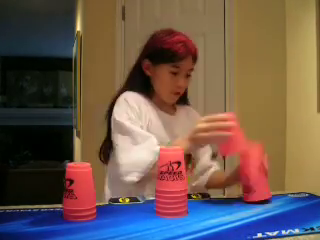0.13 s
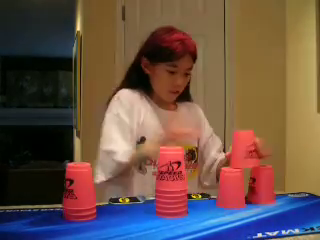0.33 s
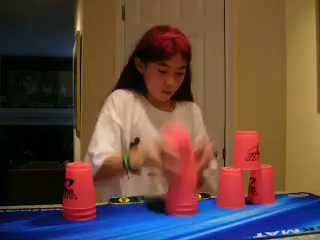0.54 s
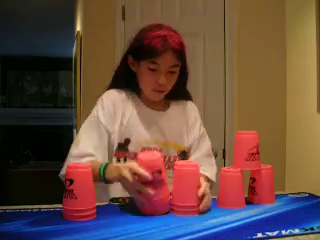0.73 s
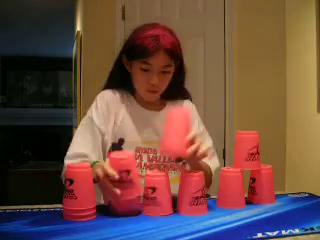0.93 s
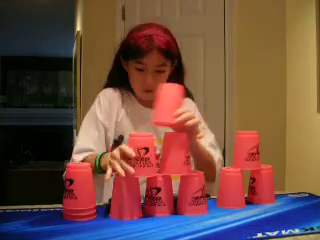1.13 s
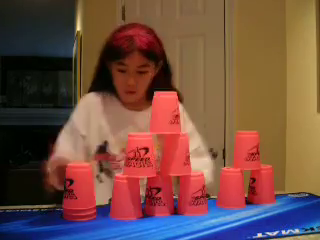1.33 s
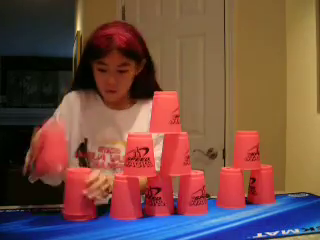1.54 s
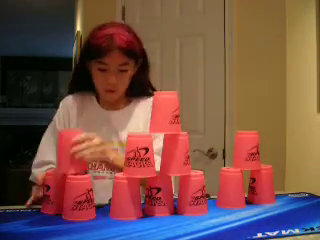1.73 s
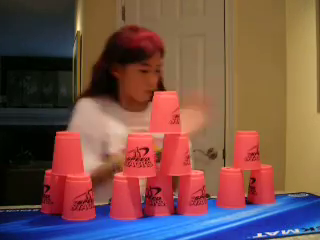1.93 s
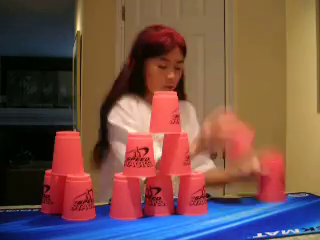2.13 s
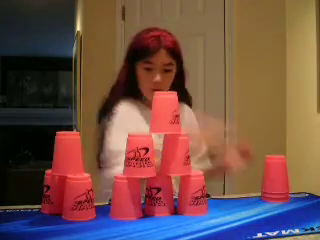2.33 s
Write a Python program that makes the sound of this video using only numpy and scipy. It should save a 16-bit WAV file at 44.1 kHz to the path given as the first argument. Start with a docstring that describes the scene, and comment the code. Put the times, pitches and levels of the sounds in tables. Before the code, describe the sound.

Hollow plastic cups are stacked at speed, clacking rapidly, easing for a moment, then ending in a dense clatter. Small pops, scrapes and soft mat thuds mix in. The room is small and echoing, the microphone slightly dull.

```python
"""In a small, echoing room, plastic cups are stacked into pyramids at speed on a mat.
Each hit makes a clack: the air in the cup, its shell and its rim all ring for a moment.
Nested cups pop and scrape as they are pulled apart, and cups landing on the mat thud softly.
A steady hush lies behind it all. The microphone dulls lows and highs and overloads on hard clacks."""
import sys
import numpy as np
from scipy import signal
from scipy.fft import rfft, irfft, next_fast_len
from scipy.io import wavfile

SR = 44100
rng = np.random.default_rng(int(sys.argv[2]) if len(sys.argv) > 2 else 0)


def int16_out(signal):
    """Quantize to a 16-bit WAV file."""
    q = np.round(np.clip(np.atleast_2d(signal).T, -1, 1) * 32767)
    wavfile.write(sys.argv[1], SR, q.astype(np.int16))


N = 110250

# Cups hitting each other; t60 is the time a sound takes to fade by 60 dB.
# t/s, air note f/Hz, air note level/dB, air note t60/s, shell level/dB, rim level/dB
CUP_HITS = [ (.091, 700, -44, 0.034, -32, -34.5), (.143, 847, -16.5, 0.06, -28, -12.5),
            (.1478, 788, 3.5, 0.009, -7, -16), (.171, 750, -27.5, 0.032, -4, -39.5),
            (.3475, 832, 5.5, 0.023, -7.5, 1.5), (.3577, 641, -0.5, 0.03, -22, -9.5),
            (.3922, 941, -3, 0.041, -3.5, -10.5), (.529, 887, -5.5, 0.013, -17, -28.5),
            (.7525, 1160, -15.5, 0.016, -28.5, -27.5), (.774, 771, -13, 0.0083, -18.5, -33),
            (.857, 1050, -4.5, 0.015, -12, -1.5), (.957, 886, -21, 0.018, -42.5, -49),
            (1.0455, 743, -23.5, 0.013, -51, -13), (1.0733, 757, 5, 0.011, -21.5, -22),
            (1.1185, 691, 4, 0.01, -2, -14.5), (1.2217, 910, 6, 0.015, -10, -9),
            (1.3012, 970, 3, 0.015, -9, -2), (1.644, 778, -24.5, 0.019, -24, -62.5),
            (1.724, 735, -33.5, 0.022, -41.5, -29), (1.7853, 553, -16.5, 0.072, -31, -19.5),
            (1.866, 823, 7.5, 0.011, -11.5, -1), (1.8829, 850, -6.5, 0.02, -14.5, -24),
            (2.154, 690, -12, 0.021, -22, -30), (2.1625, 790, -3, 0.015, -29, -23),
            (2.1724, 942, -1.5, 0.0093, -10, -25.5), (2.1782, 868, 9.5, 0.0067, -25, -24.5),
            (2.1858, 1040, -5, 0.031, -34.5, -23), (2.2055, 696, -7, 0.014, -18.5, -12.5),
            (2.2455, 680, -17.5, 0.041, -25, -8.5), (2.2558, 660, -11.5, 0.017, -12.5, -20.5),
            (2.2686, 1500, 2, 0.019, -12, -0.5), (2.2694, 1789, -4, 0.045, -19.5, -20.5),
            (2.336, 810, 0, 0.016, -16.5, -10.5), (2.347, 778, -18, 0.071, -24.5, -0.5),
            (2.3855, 795, -6.5, 0.01, -1.5, -15), ]
# The tones of a cup's shell: f/Hz, level/dB, t60/s
SHELL_TONES = [(1258, 4.5, 0.017), (1388, -13, 0.06), (1519, 0.5, 0.021), (1574, 0.5, 0.025),
               (1838, 1, 0.017), (2014, -1.5, 0.026)]
# The tones of its rim: f/Hz, level/dB, t60/s
RIM_TONES = [(2540, 2, 0.0041), (2714, -14, 0.018), (3172, -7.5, 0.012), (3717, -7.5, 0.0079)]
# Air drawn in or pushed out as a cup leaves or meets another: peak t/s, f/Hz, level/dB
AIR_POPS = [(.2123, 633, -3), (.862, 637, -5), (1.788, 710, -12)]
# Cups landing on the mat: t/s, f/Hz, level/dB
MAT_LANDINGS = [(0.147, 304, -9), (1.119, 367.4, -20), (1.786, 395, -24.5), (2.151, 354, -14.5),
                (2.162, 325.5, -10.5), (2.334, 330, -20.5)]
# Cup sliding on cup: t/s, length/s, level/dB, squeak f/Hz, squeak width/Hz
CUP_SLIDES = [(0.187, 0.019, -16, 3010, 700), (0.206, 0.08, -25, 3000, 1100),
              (0.852, 0.016, -21.5, 2750, 800), (1.056, 0.022, -15, 2830, 170),
              (1.0757, 0.0042, -14, 2860, 200), (1.0804, .005, -13, 2850, 250),
              (2.157, 0.039, -26.5, 2770, 600), (2.208, .032, -24.5, 3000, 700),
              (2.236, 0.028, -20, 2890, 890), (2.351, 0.0242, -18.5, 2950, 600)]
# How long the room echoes at each pitch: f/Hz, t60/s
ECHO_DECAY = [(150, 3.23), (400, 0.39), (1000, 0.85), (2000, 0.54), (3500, 0.6)]
# How strong its echoes are at each pitch: f/Hz, level/dB
ECHO_COLOUR = [(130, -15), (220, -8), (330, -2), (600, 0), (1000, -1.5), (2000, -1), (4000, -8.5)]
# The tones the room itself rings with: f/Hz, level/dB, t60/s
ROOM_TONES = [(354, -6, .5), (517, 0, .45), (795, -1, .4), (915, 1, .48), (1010, -6, .45), (1141, -3, .4),
              (1202, -3, .4), (1250, -2, .4), (1455, 0, .4), (1543, -1, .45), (1772, -3, .35)]
# The shape of the background hush: f/Hz, relative level/dB
HUSH_COLOUR = [(25, 15.5), (100, -10), (300, -7), (700, -18), (1200, -9), (2500, -10), (4000, -12.5)]
# How well the microphone picks up each pitch: f/Hz, level/dB
MIC_RESPONSE = [(30, -23), (120, -7.5), (280, -0.5), (420, 3), (560, 3), (950, -2), (1150, -2.5),
                (2000, -5.5), (3500, -6.5), (3950, -12.5), (4300, -26), (4650, -83.5)]

NOTE_RISE_S, CRACK_T60_S = 0.00071, 0.0042
POP_RISE_S, POP_FALL_S, POP_ECHO_DB = 0.0015, 0.0028, -3
THUD_RISE_S, THUD_T60_S = 0.0015, 0.026
SLIPS_PER_S = 1400
TAIL_DB, EARLY_DB, ROOM_TONES_DB = -4.5, -6, -48
ECHO_RISE_S, EARLY_T60_S = 0.0025, 0.2
HUSH_DB = -37.5
MIC_OFFSET, CLIP_DB, CLIP_HARDNESS, TOP_HZ = -0.033, -2, 32, 16500


def cup_clacks():
    """Each hit gives a sharp crack and rings the air in the cup, its shell and its rim."""
    track, t = np.zeros(N), np.arange(SR // 10) / SR
    for start, hz, note_db, t60, shell_db, rim_db in CUP_HITS:
        air_note = np.sin(2 * np.pi * hz * t) * fade(t, t60) * (1 - np.exp(-t / NOTE_RISE_S))
        crack = rng.standard_normal(len(t)) * fade(t, CRACK_T60_S)
        shell = ring(SHELL_TONES, t, phase_scatter=0.65)
        rim = ring(RIM_TONES, t)
        clack = amp(note_db) * air_note + amp(shell_db) * shell + amp(rim_db) * (rim + crack)
        add(track, start, in_room(clack))
    return track


def air_pops():
    """The air in a cup swells into one round note and dies away."""
    track, t = np.zeros(N), np.arange(-SR // 20, SR // 20) / SR
    swell = 1 / (np.exp(-t / POP_RISE_S) + np.exp(t / POP_FALL_S))
    swell /= swell.max()
    for peak_time, hz, db in AIR_POPS:
        pop = amp(db) * swell * np.sin(2 * np.pi * hz * t)
        add(track, peak_time + t[0], in_room(pop, echo_db=POP_ECHO_DB))
    return track


def mat_thuds():
    """The padded table answers a landing cup with a short, low note."""
    track, t = np.zeros(N), np.arange(SR // 10) / SR
    loudness = fade(t, THUD_T60_S) * (1 - np.exp(-t / THUD_RISE_S))
    for start, hz, db in MAT_LANDINGS:
        thud = amp(db) * loudness * np.sin(2 * np.pi * hz * t)
        add(track, start, in_room(thud))
    return track


def cup_scrapes():
    """Tiny, uneven slips ring the cup's wall: a narrow band of pitches squeaks, a wide one rasps."""
    track, t = np.zeros(N), np.arange(SR // 10) / SR
    for start, length, db, hz, width in CUP_SLIDES:
        slips = (rng.random(len(t)) < SLIPS_PER_S / SR) * rng.standard_normal(len(t))
        # The wall favours the pitches close to hz.
        squeak = filtered(slips, lambda f: 1j * f * width / (hz ** 2 - f ** 2 + 1j * f * width))
        progress = np.minimum(t / length, 1)
        stroke = np.sqrt(np.abs(np.sin(np.pi * progress)))
        stroke_level = np.sqrt(np.mean(stroke ** 2))
        scrape = amp(db) * stroke_level * unit(stroke * squeak)
        add(track, start, in_room(scrape))
    return track


def in_room(sound, echo_db=0):
    """Add the room's echoes, drawn anew each time because they differ from spot to spot on the table."""
    t = np.arange(SR * 3 // 4) / SR
    # Split noise into pitches and let each fade at its own speed.
    hz, times, bands = signal.stft(rng.standard_normal(len(t)), SR, nperseg=256)
    bands = bands * fade(times, along(ECHO_DECAY, hz)[:, None])
    tail = signal.istft(bands, SR)[1][:len(t)]
    early = rng.standard_normal(len(t)) * fade(t, EARLY_T60_S)
    echoes = amp(TAIL_DB) * tail / np.linalg.norm(tail) + amp(EARLY_DB) * early / np.linalg.norm(early)
    echoes = filtered(echoes, lambda f: amp(along(ECHO_COLOUR, f)))
    echoes += amp(ROOM_TONES_DB) * ring(ROOM_TONES, t, phase_scatter=1)
    response = amp(echo_db) * echoes * (1 - np.exp(-(t / ECHO_RISE_S) ** 2))
    response[0] = 1  # the sound that arrives directly
    return signal.fftconvolve(sound, response)


def room_hush():
    """The room's steady background noise, strongest in the deep bass."""
    hush = filtered(rng.standard_normal(N), lambda f: amp(along(HUSH_COLOUR, f)))
    return amp(HUSH_DB) * unit(hush)


def ring(tones, t, phase_scatter=0):
    """The fading tones of something struck, mixed a little differently for each blow."""
    hz, db, t60 = np.transpose(tones)[:, :, None]
    gain = amp(db + 2 * rng.standard_normal(hz.shape))
    waves = np.sin(2 * np.pi * (hz * t + phase_scatter * rng.random(hz.shape)))
    return (gain * waves * fade(t, t60)).sum(0) / np.linalg.norm(gain)


def amp(db):
    """Turn decibels into a number to multiply by."""
    return 10 ** (np.asarray(db) / 20)


def unit(x):
    """Scale a sound so its average level (rms) is 1."""
    return x / np.sqrt(np.mean(x ** 2) + 1e-20)


def along(points, hz):
    """Read between a table's (f/Hz, value) points on a log frequency scale."""
    f, values = np.transpose(points)
    return np.interp(np.log(hz + 1), np.log(f + 1), values)


def fade(t, t60):
    """A curve that falls by 60 dB every t60 seconds."""
    return np.exp(-np.log(1000) * t / t60)


def filtered(x, response):
    """Turn each frequency f in x up or down by response(f)."""
    size = next_fast_len(len(x) + SR // 2)
    hz = np.fft.rfftfreq(size, 1 / SR)
    return irfft(rfft(x, size) * response(hz), size)[:len(x)]


def add(track, seconds, x):
    """Mix x into the track at the given time."""
    start = max(round(seconds * SR), 0)
    track[start:start + len(x)] += x[:max(N - start, 0)]


def scene():
    """All the cup sounds over the room's hush, in one channel."""
    return (cup_clacks() + air_pops() + mat_thuds() + cup_scrapes() + room_hush())[None]


def record(dry):
    """The microphone dulls the lows and highs and flattens the loudest peaks."""
    x = filtered(dry[0], lambda f: amp(along(MIC_RESPONSE, f)))
    x += MIC_OFFSET  # off centre, so one side of the wave overloads first
    clipped = x / (1 + np.abs(x / amp(CLIP_DB)) ** CLIP_HARDNESS) ** (1 / CLIP_HARDNESS)
    return filtered(clipped, lambda f: f < TOP_HZ)[None]


dry = scene()
out = record(dry)
int16_out(out)
```